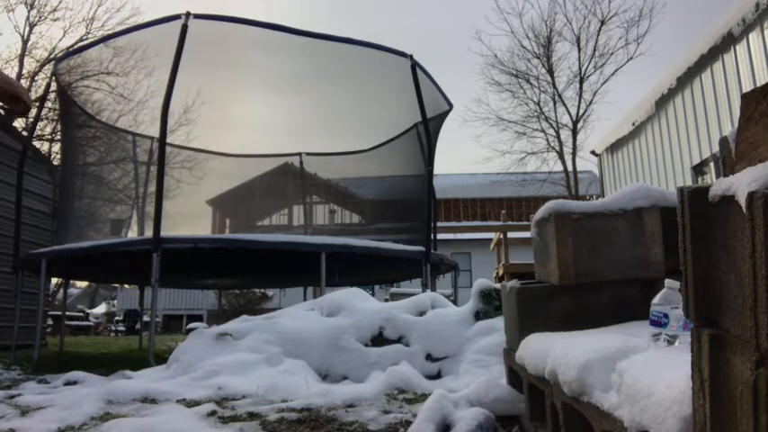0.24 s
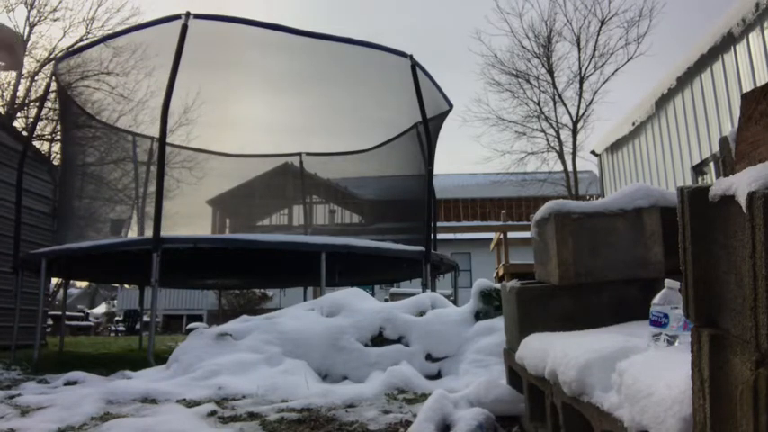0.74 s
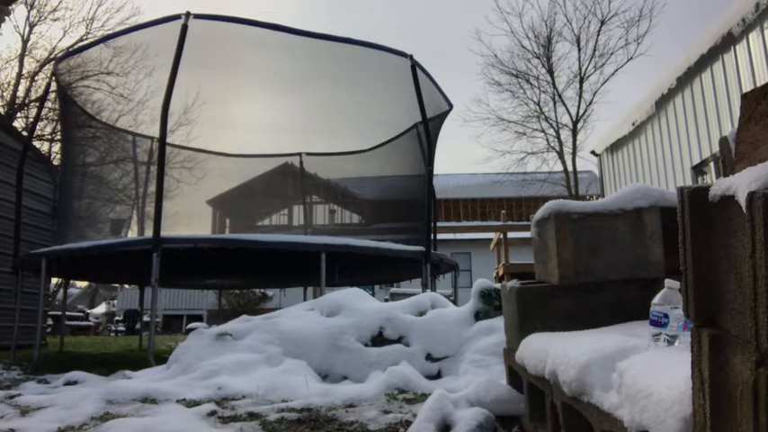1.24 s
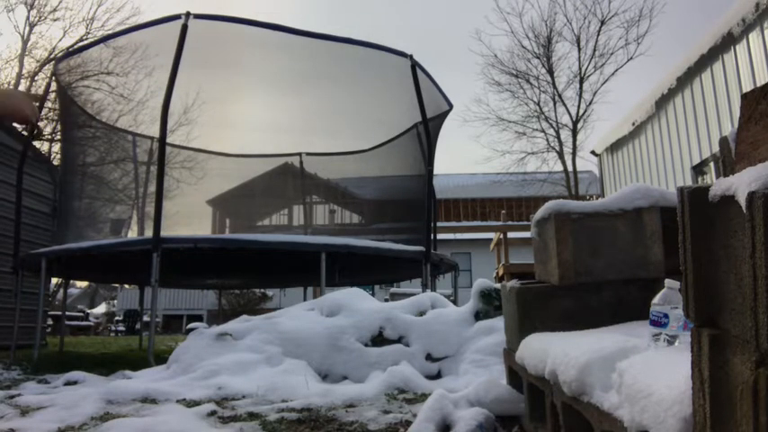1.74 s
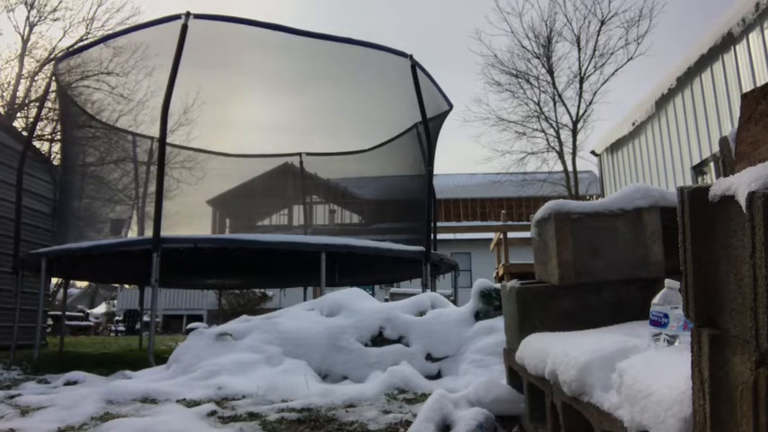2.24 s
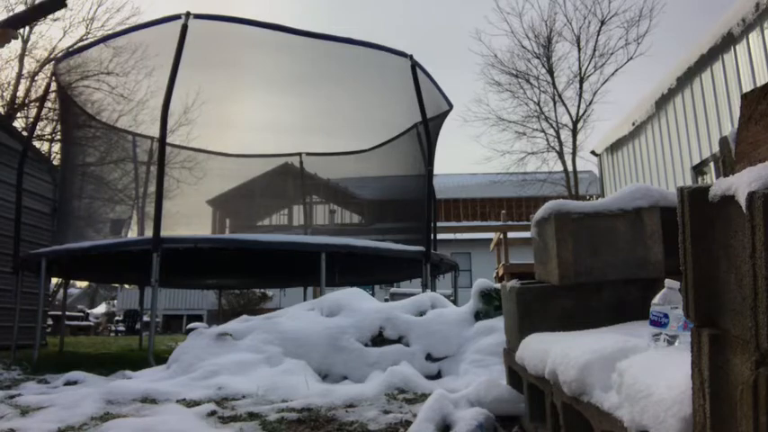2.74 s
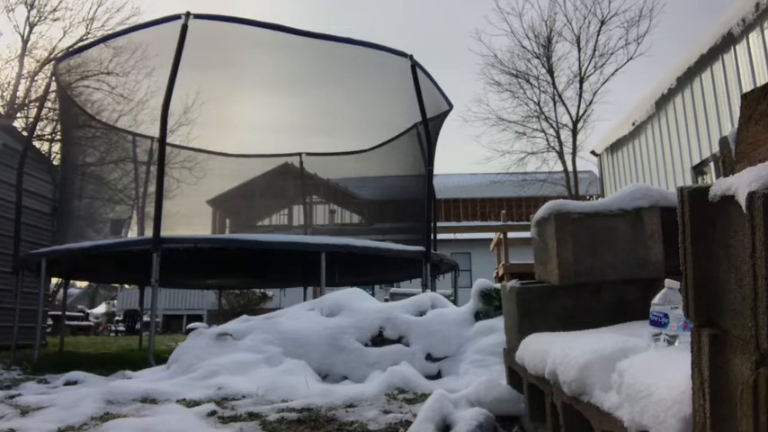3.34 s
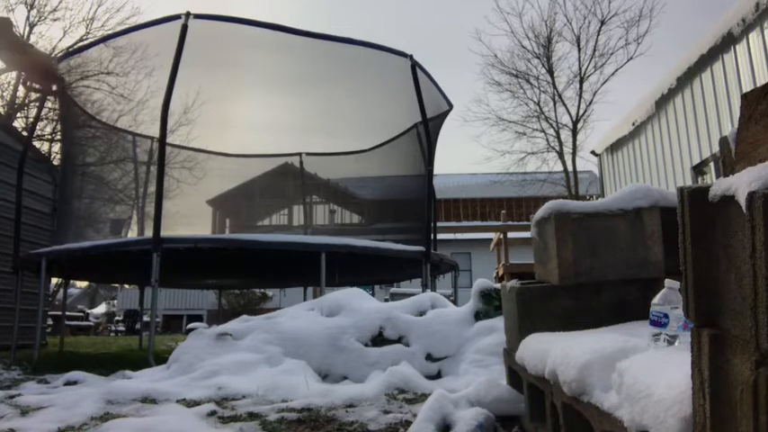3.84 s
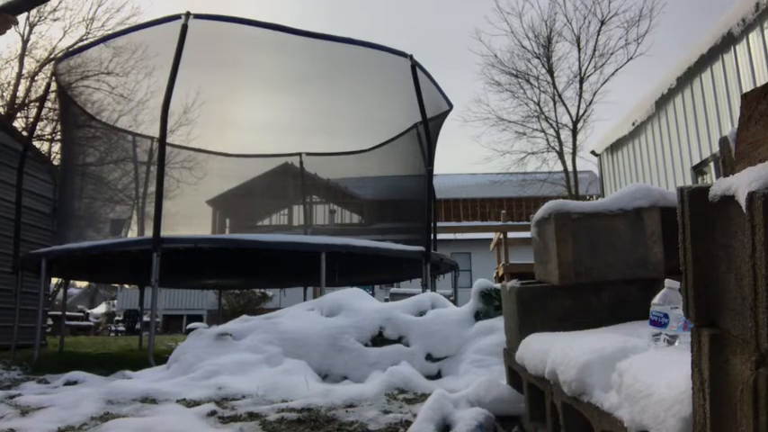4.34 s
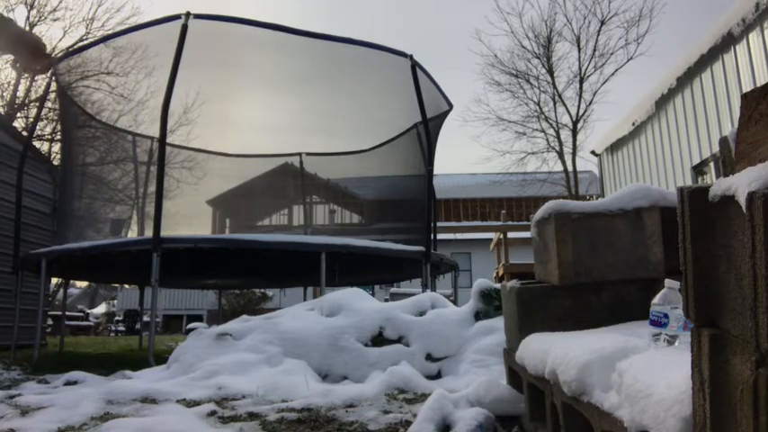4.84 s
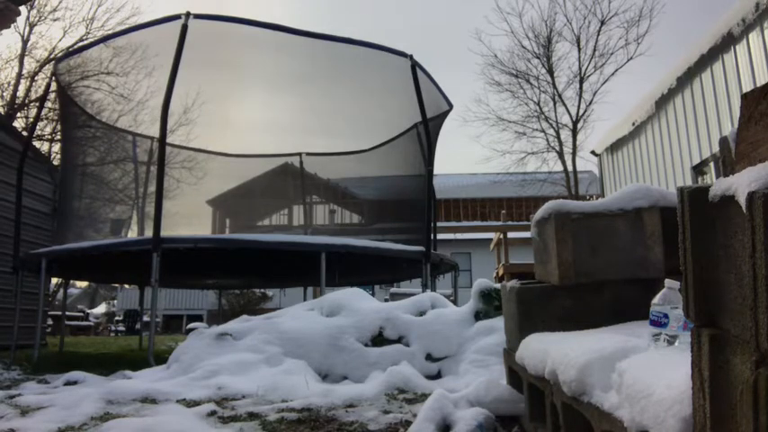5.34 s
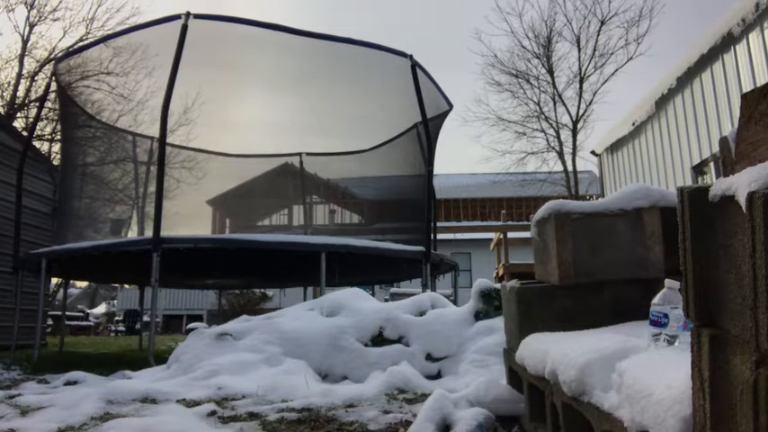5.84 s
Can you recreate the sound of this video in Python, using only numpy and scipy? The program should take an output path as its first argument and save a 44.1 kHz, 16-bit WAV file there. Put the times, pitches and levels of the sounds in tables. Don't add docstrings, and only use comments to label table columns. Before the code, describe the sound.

A six-second stretch of an air rifle being pumped by its lever in a snowy yard, very close to the microphone. At 0.2 s the opening lever touches its stop and rests with a mid-pitched click; at 0.54 s it slams shut, two or three contacts within milliseconds, bright steel over hollow plastic with a short low thump. A soft latch knock follows at 0.66 s. The cycle repeats with stop clicks near 0.95, 1.7, 2.5, 3.25, 4.05 and 5.05 s, and slams near 1.28, 2.09, 2.87, 3.63, 4.63 and 5.69 s, the last two strokes slower. Between them come tiny pin ticks, plastic creaks, grainy sliding, brief high squeaks and faint air hiss. Glove rubs and breathy valve whistles are barely audible. Sheds return short diffuse echoes; a low machine hum and yard air sit far beneath. Loose ticks close the stretch at 5.8-5.97 s.

```python
import sys
import numpy as np
from scipy import signal
from scipy.fft import rfft, irfft, next_fast_len
from scipy.io import wavfile
from scipy.ndimage import uniform_filter1d, map_coordinates

SR = 44100
rng = np.random.default_rng(int(sys.argv[2]) if len(sys.argv) > 2 else 0)


def makeup_ratio(level_db):
    decades = np.asarray(level_db, float) / 20
    return 10 ** decades


def unload_audio(sound):
    columns = np.transpose(np.atleast_2d(sound))
    steps = np.round(np.clip(columns, -1, 1) * 32767)
    wavfile.write(sys.argv[1], SR, steps.astype(np.int16))


N = 267667

# start_s [s], touch_db [dB], slip_db [dB], hardness_db [dB]
STOP_TOUCHES = [
    (0.1621, -41.5, -37.5, 0),
    (0.9382, -38.5, -39.5, 1),
    (1.66, -39, -36, 0.5),
    (2.4836, -38, -38, 1.5),
    (3.2489, -39, -37, -0.5),
    (4.034, -41, -36, 0),
    (5.0351, -39, -44, 0),
]
# start_s [s], peak_db [dB], grip_hz [Hz], extra_stock_db [dB]
REST_BLOWS = [
    (.1820, -18.5, 1840, -4),
    (.9574, -19.5, 1830, -6),
    (1.6792, -19, 1750, -1),
    (2.5026, -19.5, 1927, 0),
    (3.2680, -20.5, 1950, -1),
    (4.0533, -20, 2040, -1),
    (5.0552, -18.5, 1850, -6),
]
# start_s [s], level_db [dB], hardness_db [dB], extra_stock_db [dB], extra_grip_db [dB]
LATCH_KNOCKS = [
    (0.6585, -34, -1.5, -1.5, -6),
    (1.3883, -35.5, 2, -0.5, -0.5),
    (2.2194, -37, -0.5, -0.5, -1),
    (2.981, -35, -0.5, 1, 0),
    (3.761, -34, -1.5, 0, 1.5),
    (4.7636, -34, -1, 0, 0),
    (5.839, -37.5, -3, 0.5, -2.5),
]
# start_s [s], level_db [dB], hardness_db [dB], extra_stock_db [dB], extra_grip_db [dB]
SEATINGS = [
    (0.5399, -11, 1, 3, 4.8),
    (1.2842, -8.5, 0.65, 4.3, 1),
    (2.0859, -11.5, -1.9, 1.8, 1.7),
    (2.869, -12.5, -0.78, 2, 1.1),
    (3.631, -9, -1, 2.5, 0.89),
    (4.632, -10.5, 0.67, 2.2, 2.4),
    (5.689, -10, 0.94, 3, 3.5),
]
# stock_db [dB], grip_db [dB], tube_db [dB], link_db [dB], rattle_t60_ms [ms]
BY_SEAT = (-8, -1, 2.5, 2, 54)
LATCH_REACH = (1, 2, -3.5, -7.5, 29)


def unit(x):
    return x / np.sqrt(np.mean(x ** 2) + 1e-20)


def along(points, hz):
    f, v = np.transpose(points)
    return np.interp(np.log(hz + 1), np.log(f + 1), v)


def wobble(rate):
    knots = rng.standard_normal(int(N * rate / SR) + 4)
    return map_coordinates(knots, [np.arange(N) * rate / SR])


def rush(spectrum):
    m = next_fast_len(N + 8192)
    colour = makeup_ratio(along(spectrum, np.fft.rfftfreq(m, 1 / SR)))
    return unit(irfft(rfft(rng.standard_normal(m)) * colour, m)[:N])


def lay(sounds, start_s):
    length = sounds.shape[1]
    where = np.round(start_s * SR).astype(int) + np.arange(length)
    return np.bincount(where.ravel(), sounds.ravel(), N + length)[:N]


def ring(force, modes, scatter_db, head):
    f = np.fft.rfftfreq(force.shape[1], 1 / SR)
    gains = makeup_ratio(scatter_db * rng.standard_normal((len(force), len(modes))))
    shapes = np.array([(-1) ** k * makeup_ratio(db) * 1j * f * w / (c * c - f * f + 1j * f * w)
                       for k, (c, w, db) in enumerate(modes)])
    soft = 1 / (1 + 1j * f / (1.2 * modes[-1][0]))
    soft = soft * (1j * f / (1j * f + 430)) ** 2
    out = irfft(rfft(force) * (gains @ shapes) * soft, force.shape[1])
    return out / np.sqrt(np.mean(out[:, :head] ** 2, axis=1, keepdims=True))


def contacts(rows, parts, rise_s, spiky_db, blow, scatter_db):
    # pitch_hz [Hz], width_hz [Hz], level_db [dB]
    link_modes = [(6000, 410, -7), (6940, 510, -1), (9080, 1000, -4), (9830, 690, -3.5), (10970, 720, -7.5),
                  (12350, 920, -6.5), (12820, 480, -9.5), (14900, 980, -6.5), (15100, 920, -7)]
    s, *levels, t60_ms = np.transpose(rows)[:, :, None]
    t = np.arange(2048) / SR
    spikes = makeup_ratio(spiky_db * rng.standard_normal((len(s), len(t))))
    chatter = rng.standard_normal((4, len(s), len(t))) * spikes
    lives = (0.71, 0.85, 0.65, 0.53)
    weights = (1.8, 0.85, 0.46, 0.58)
    heads = (121, 102, 79, 67)
    sound = 0
    for db, grit, modes, share, weight, head in zip(levels, chatter, [*parts, link_modes], lives, weights, heads):
        decay = makeup_ratio(-60 * t / (share * np.maximum(t60_ms, 3) / 1000))
        force = grit * (1 - np.exp(-t / rise_s)) * decay
        force[:, 8] += blow * weight
        sound = sound + makeup_ratio(db) * ring(force, modes, scatter_db, head)
    return lay(sound, s)


def struck(rows, kind):
    # stock [dB/dB], grip [dB/dB], tube [dB/dB], link [dB/dB]
    hardness_tilt = (-0.014, -0.52, 0.25, 0.88)
    out = []
    for s, db, hard_db, *extra in rows:
        held = np.pad(extra, (0, 4 - len(extra)))
        levels = db + np.array(kind[:4]) + hard_db * np.array(hardness_tilt) + held
        out.append((s, *levels, kind[4]))
    return out


def swells(rows, modes, lumpy_db):
    s, length, db = np.transpose(rows)[:, :, None]
    t = np.arange(8192) / SR
    lumps = makeup_ratio(lumpy_db * wobble(45)[:len(s) * len(t)].reshape(len(s), -1))
    force = rng.standard_normal(lumps.shape) * lumps * np.sin(np.pi * np.minimum(t / length, 1)) ** 2
    return lay(makeup_ratio(db) * ring(force, modes, scatter_db=5, head=4096), s)


def background():
    # pitch_hz [Hz], density_db [dB per Hz]
    air_curve = [(20, -21.5), (55, -0.5), (110, -7), (200, -13.5), (330, -20), (750, -26), (2000, -34),
                 (5000, -44.5), (14000, -56), (16500, -55)]
    # pitch_hz [Hz], level_db [dB rms], start_phase [radians]
    hum_lines = [(35.01, -71, -1.53), (55.44, -44.5, 1.42), (124.39, -73, -.04)]
    t = np.arange(N) / SR
    hum = sum(np.sqrt(2) * makeup_ratio(db) * np.sin(2 * np.pi * hz * t + start) for hz, db, start in hum_lines)
    return makeup_ratio(0.6 + 0.4 * wobble(3)) * hum + makeup_ratio(-57 + 1.1 * wobble(5)) * rush(air_curve)


def slide():
    # pitch_hz [Hz], density_db [dB per Hz]
    rub_curve = [(240, -27), (400, -10), (513, -1.5), (971, -1), (1350, -6), (3070, -6.5), (14100, -16),
                 (15700, -15.5), (16500, -53)]
    latch_db, stop_db, eased_db, shut_db, ease_s = -57.5, -59.5, -68.5, -70, 0.08
    stations = [(0.023, latch_db)]
    stations += [(s, latch_db) for s, *_ in LATCH_KNOCKS]
    stations += [(s, shut_db) for s, *_ in SEATINGS]
    for s, *_ in STOP_TOUCHES:
        stations += [(s, stop_db), (s + ease_s, eased_db)]
    s, db = np.transpose(sorted(stations))
    grain = makeup_ratio(wobble(89) + 0.76 * wobble(8.7))
    return makeup_ratio(np.interp(np.arange(N) / SR, s, db) - 1.5) * unit(grain * rush(rub_curve))


def leak():
    # pitch_hz [Hz], density_db [dB per Hz]
    hiss_curve = [(2500, -29), (5000, -6.5), (9000, -1), (10500, -6.5), (12200, 1), (15500, -2.5),
                  (16500, -40)]
    spurt_db, spurt_s, still_db, drawn_db, stops_in_s = -55.5, 0.16, -81, -68.5, 0.03
    stations = []
    for s, *_ in SEATINGS:
        stations += [(s - 0.001, still_db), (s, spurt_db), (s + spurt_s, still_db)]
    for s, *_ in STOP_TOUCHES:
        stations += [(s, drawn_db), (s + stops_in_s, still_db)]
    s, db = np.transpose(sorted(stations))
    return makeup_ratio(np.interp(np.arange(N) / SR, s, db) + 1.5 * wobble(40)) * rush(hiss_curve)


def seal():
    squeaks = [
        (0.1514, -45),
        (0.9359, -43.5),
        (1.653, -38),
        (2.472, -44),
        (3.2491, -49.5),
        (4.0213, -50),
        (5.0255, -48),
    ]
    out, t = np.zeros(N + SR), np.arange(SR // 80) / SR
    for s, db in squeaks:
        hz = 12400 * (1 + 0.02 * rng.standard_normal())
        drift = np.cumsum(0.12 * rng.standard_normal(len(t)))
        squeak = np.hanning(len(t)) * np.sin(2 * np.pi * hz * t + drift)
        out[round(s * SR):][:len(t)] += makeup_ratio(db - 10) * squeak
    return out[:N]


def stop_contacts():
    # pitch_hz [Hz], width_hz [Hz], level_db [dB]
    stop_modes = [
        [(630, 120, -4), (820, 220, -3), (1150, 260, -5)],
        [(1800, 350, -3), (2450, 600, -6)],
        [(3100, 300, 0), (4330, 500, -5), (5150, 450, -2)],
    ]
    # stock dB, grip dB, tube dB, link dB, rattle t60 ms
    by_touch, by_slip, by_rest = (-8, -4, 0, -6, 48), (-5, -1, -10, -13.5, 39.5), (-21, -21, -26, -30, 75)
    held_stock_db = [1, -2.5, 0, -2.5, 0.5, 2.5, -4.5]
    held_grip_db = [-2.3, 0.92, 0.4, -1.1, -1, 1, 0.5]
    rows = []
    for touch, rest, *held in zip(STOP_TOUCHES, REST_BLOWS, held_stock_db, held_grip_db):
        s, touch_db, slip_db, hard_db = touch
        rows += struck([(s, touch_db, hard_db, *held)], by_touch)
        rows += struck([(s + 0.0087, slip_db, hard_db, *held)], by_slip)
        rows += struck([(rest[0], rest[1], hard_db, *held)], by_rest)
    rise_s = np.tile([0.001, 0.0006, 0.0005], len(STOP_TOUCHES))[:, None]
    blow = np.tile([1.5, 5, 1], len(STOP_TOUCHES))
    return contacts(rows, stop_modes, rise_s=rise_s, spiky_db=5, blow=blow, scatter_db=2.5)


def thump():
    # start_s [s], level_db [dB]
    jolts = [
        (0.536, -15),
        (1.285, -14.5),
        (2.085, -17),
        (2.867, -17.5),
        (3.629, -17.5),
        (4.629, -21),
        (5.687, -17.5),
    ]
    pushes = [(s, db, 210) for s, db, *_ in jolts + struck(LATCH_KNOCKS, LATCH_REACH)]
    pushes += [(s, -36, 135) for s, *_ in STOP_TOUCHES + REST_BLOWS]
    out, t = np.zeros(N + SR), np.arange(SR // 10) / SR
    for s, db, hz in pushes:
        low = makeup_ratio(-11.5 - 60 * t / 0.035) * np.sin(2 * np.pi * hz * t)
        low += makeup_ratio(-22 - 60 * t / 0.03) * np.sin(2 * np.pi * 1.43 * hz * t)
        out[round(s * SR):][:len(t)] += makeup_ratio(db) * low * (1 - np.exp(-t / 0.0029))
    return out[:N]


def snaps():
    # start_s [s], peak_db [dB]
    catch_snaps = [(.5351, -8), (.5402, -4), (1.2808, -4), (1.2846, -7), (2.0815, -9), (2.0862, -6),
                   (2.8625, -2), (3.6274, -2), (4.6282, -2), (4.6334, -6), (5.6855, -2), (5.6906, -9),
                   (2.4925, -28), (2.4942, -28)]
    # pitch_hz [Hz], width_hz [Hz], level_db [dB]
    catch_modes = [(3950, 850, 2.5), (7000, 900, 2.5), (9500, 1300, -8), (15200, 2500, -9)]
    # start_s [s], peak_db [dB], pitch_hz [Hz], width_hz [Hz]
    bounces = [(.5408, -4.5, 1270, 450), (.5415, -0.5, 5000, 600), (.5424, -12, 3100, 600),
               (.5447, -11, 3290, 700), (1.2823, -9.5, 3000, 597), (1.2852, 2, 3140, 351),
               (1.2853, -13, 930, 400), (1.2864, -8, 4900, 500), (1.2886, -9, 3900, 704),
               (2.0872, -3, 2450, 900), (2.0886, -7, 5200, 497), (2.0895, -3, 3100, 593),
               (2.8696, -3, 3030, 451), (2.8698, -6.5, 1120, 380), (2.8722, -4, 2730, 502),
               (2.8745, -14, 846, 200), (3.6313, 3, 2740, 453), (3.6330, -3, 4760, 500),
               (3.6347, -10.5, 3206, 594), (4.6322, -1.5, 1358, 503), (4.6330, -0.5, 5250, 496),
               (4.6350, -2, 4600, 700), (4.6362, -14.5, 953, 300), (5.6864, -14.5, 790, 149.5),
               (5.6894, -5, 3300, 687), (5.6928, 3.5, 2970, 442), (.7464, -36, 1560, 130),
               (2.2965, -33, 1570, 200), (3.842, -36.5, 1500, 90), (5.9222, -26, 1554, 130.5),
               (1.4688, -40.5, 1600, 150), (5.899, -35.5, 763, 119.7), (3.8165, -37, 5370, 399),
               (2.274, -30.5, 5280, 400)]
    # start_s [s], peak_db [dB], pitch_hz [Hz], width_hz [Hz]
    booms = [(.5362, -16, 630, 68), (.5440, -18.5, 560, 200), (3.6385, -19.5, 720, 150),
             (5.6960, -16.5, 780, 94), (4.6325, -5.5, 7400, 550), (4.6345, -11, 3600, 700),
             (3.6322, -7, 3050, 390), (1.2862, -6.5, 3800, 370), (.4262, -35, 900, 200),
             (.4264, -33.5, 2700, 350), (0.82, -42, 770, 230), (.7188, -38, 4800, 450),
             (1.1905, -42, 1500, 250), (0.61, -32, 1600, 350), (2.0125, -49.5, 3100, 400),
             (1.8455, -49, 1570, 200), (0.72, -32.5, 3100, 360), (.6588, -35, 4100, 500),
             (2.531, -48, 3280, 250)]
    # start_s [s], peak_db [dB], pitch_hz [Hz], width_hz [Hz]
    hollows = [(.5400, -11, 1000, 260), (1.2845, -11, 890, 130), (2.0865, -14.5, 880, 90),
               (2.8625, -15, 790, 120), (2.8748, -15.5, 800, 140), (3.6270, -12.5, 940, 160),
               (3.6322, -12, 840, 230), (4.6355, -7.5, 930, 180), (4.6325, -14.5, 860, 250),
               (4.6285, -9.5, 3800, 560), (3.6326, -8.5, 3000, 450), (2.8698, -10, 4200, 530),
               (4.4118, -45.5, 1700, 350), (4.414, -52, 910, 130), (4.3222, -52.5, 1320, 360),
               (.5370, -15, 800, 170), (1.2812, -12.5, 800, 180), (2.0835, -14, 910, 170),
               (2.8655, -20, 1100, 230), (4.629, -15.5, 780, 200), (5.6900, -11.5, 796, 130),
               (5.690, -14.5, 1800, 230), (1.2860, -12.5, 1500, 400), (2.0885, -14.5, 1600, 320),
               (3.6345, -10, 4200, 500), (2.8705, -13, 5300, 580), (2.873, -14.5, 4900, 700),
               (4.643, -21.5, 900, 150), (3.645, -23.5, 900, 150), (5.6880, -13, 1035, 200),
               (5.6915, -10, 2420, 350), (1.2870, -14, 1010, 200), (.7190, -38, 1500, 300),
               (1.4466, -36, 5300, 500), (3.0355, -34, 5300, 450), (2.2745, -40, 1450, 300),
               (.5425, -15, 1000, 200)]
    # pitch_hz [Hz], width_hz [Hz], over_contact_db [dB]
    latch_rings = [(660, 130, -4), (920, 140, 1), (2280, 220, 4), (3100, 300, 2), (4100, 600, 2),
                   (6800, 1200, -5)]
    # pitch_hz [Hz], width_hz [Hz], over_contact_db [dB]
    rest_rings = [(1170, 300, -8), (2550, 450, 0), (3030, 400, -8), (4250, 800, -5), (6800, 1300, -4),
                  (11500, 3000, -9)]
    clean_db = 2.5
    rows = [(s, db + clean_db, hz, width) for s, db, hz, width in bounces] + booms + hollows
    rows += [(s, db + level, hz, width) for s, db in catch_snaps for hz, width, level in catch_modes]
    rows += [(s + 0.0004, db + level, hz, width) for s, db, *_ in LATCH_KNOCKS for hz, width, level in latch_rings]
    for s, db, grip_hz, extra_db in REST_BLOWS:
        rows += [(s, db + level, hz, width) for hz, width, level in rest_rings]
        rows += [(s, db, grip_hz, 210)]
        rows += [(s + 0.0008, db + extra_db - 5, 765, 120)]
    rows += [(s + 0.003, db + 7, 640, 140) for s, db, *_ in STOP_TOUCHES]
    s, db, hz, width = np.transpose(rows)[:, :, None]
    t = np.arange(SR // 30) / SR
    sound = makeup_ratio(db) * np.sin(2 * np.pi * hz * t) * np.exp(-np.pi * width * t) * (1 - np.exp(-t / 0.00016))
    return signal.sosfilt(signal.butter(3, 480, "hp", fs=SR, output="sos"), lay(sound, s))


def stock_linger():
    # pitch_hz [Hz], over_stock_db [dB], t60_s [s]
    slow_modes = [(872, -7.5, .1), (1760, -15.5, 0.12)]
    blows = struck(SEATINGS, BY_SEAT) + [(s, db - 12) for s, db, *_ in REST_BLOWS]
    out, t = np.zeros(N + SR), np.arange(SR // 5) / SR
    for s, stock_db, *_ in blows:
        for hz, db, t60 in slow_modes:
            drift = np.cumsum(0.046 * rng.standard_normal(len(t)))
            envelope = makeup_ratio(stock_db + db - 60 * t / t60) * (1 - np.exp(-t / 0.0016))
            out[round(s * SR):][:len(t)] += envelope * np.sin(2 * np.pi * hz * t + drift)
    return out[:N]


def air_and_glove():
    # pitch_hz [Hz], width_hz [Hz], level_db [dB]
    gulp_modes = [(1200, 200, -3), (1500, 300, -0.5), (1830, 250, -4.5)]
    # pitch_hz [Hz], width_hz [Hz], level_db [dB]
    palm_modes = [(614, 120, -2), (880, 94, -6), (1460, 470, -12)]
    # start_s [s], length_s [s], level_db [dB]
    squeezes = [
        (.43, 0.046, -64.5),
        (1.13, 0.13, -66),
        (1.87, 0.11, -60),
        (2.69, 0.11, -58.5),
        (3.47, 0.109, -62.5),
        (4.29, 0.12, -69.5),
        (5.25, 0.081, -62.5),
    ]
    # start_s [s], length_s [s], pitch_hz [Hz], width_hz [Hz], level_db [dB]
    whistles = [
        (.965, 0.1, 1800, 60, -70.5),
        (4.113, 0.17, 1875, 45, -76),
        (4.52, .12, 2363, 14, -77.5),
    ]
    # start s, length s, dB
    gulps = [(s + 0.0193 + 0.0046, 0.13, -66) for s, *_ in STOP_TOUCHES]
    valve = sum(swells([(s, length, db)], [(hz, width, 0)], lumpy_db=3.5)
                for s, length, hz, width, db in whistles)
    return swells(gulps, gulp_modes, lumpy_db=4.5) + swells(squeezes, palm_modes, lumpy_db=5) + valve


def ticks():
    # pitch_hz [Hz], width_hz [Hz], level_db [dB]
    pivot_modes = [
        [(790, 290, 7.5), (1060, 130, -10.5)],
        [(1390, 160, 1.5), (2550, 450, -3.5)],
        [(3020, 300, -1), (4040, 560, -2), (5250, 650, 0)],
    ]
    # start_s [s], level_db [dB], hardness_db [dB]
    pins = [(.7036, -43.5, 1.5), (.7182, -40, -1.5), (.9312, -59, 1), (1.2256, -43.5, 1.5),
            (1.4259, -46.5, 0), (1.4462, -39, -3), (1.608, -59.5, -1), (1.877, -56, 3.5),
            (2.2739, -40.5, -6), (2.7313, -46, 3), (2.7804, -45, -1.5), (2.8555, -48, -1.5),
            (3.0351, -38, -5), (3.4666, -56.5, -2.5), (3.5051, -50, 1.5), (3.575, -47.5, -1),
            (3.6905, -46, 1.5), (3.8083, -43.5, -1), (4.3027, -48, 1), (4.3217, -47.5, 1),
            (4.4115, -45, -1), (4.8125, -35.5, 0), (4.8466, -44, 0.5), (5.2851, -50, 4), (5.3049, -46, 0.5),
            (5.4015, -56, 4), (5.4146, -50, 5.5), (5.8873, -41, -0.5), (5.9112, -38, -3),
            (5.965, -40.5, 2.5)]
    # start_s [s], level_db [dB], hardness_db [dB]
    creaks = [(.426, -37, 3), (.5606, -44, 2.5), (.7462, -41, -3.5), (1.1901, -42.5, 2), (1.4686, -47, -6),
              (1.4863, -42.5, 4), (1.7039, -64, -12), (1.8928, -60, 14), (1.9225, -55.5, 10),
              (2.03, -51.5, 11.5), (2.013, -63, 7.5), (2.2962, -45, -1), (2.3204, -42.5, -2),
              (2.728, -75, -5.5), (2.898, -42.5, 11), (3.0539, -48, 14), (3.0595, -42.5, -2.5),
              (3.0912, -49.5, -3), (3.3365, -66, -5.5), (3.3426, -58.5, 5), (3.5012, -60, -6.5),
              (3.8163, -38, 9), (3.842, -45.5, -7), (3.8796, -48.5, 8), (4.8347, -37.5, 3),
              (4.8766, -49, -3), (5.7093, -39.5, -6), (5.8738, -46, -4), (5.8956, -33.5, 11),
              (5.9217, -35, 8)]
    # start_s [s], level_db [dB], hardness_db [dB]
    shifts = [(.2159, -79, -12), (.339, -58, -7), (.4101, -59.5, 7), (.4541, -66, -6), (.5169, -57, -1),
              (.5292, -75, 7), (.6963, -68, -2), (1.1173, -58.5, -5), (1.1755, -59, 3), (1.257, -64, 3),
              (1.2627, -59, -1), (1.6525, -60, 3), (5.664, -57, -1), (1.845, -60.5, -6.5),
              (2.0637, -59, -1), (2.0747, -60, -7), (2.3118, -60, -11), (2.3422, -61, 11),
              (2.3693, -69, 14), (2.695, -58, 4), (3.026, -58, 4), (3.129, -78, 7), (3.6085, -58, -1),
              (3.7956, -59, 3), (4.2589, -63, 3.5), (4.6095, -59.5, 2), (4.6173, -55, 0.5),
              (5.242, -62, 5.5), (5.2514, -57.5, -2), (5.814, -63, 8)]
    rows = struck(pins, (-7.5, -5.5, 0, 2, 30))
    rows += struck(creaks, (-2.5, -1, -4, -14, 39))
    rows += struck(shifts, (-1.5, -0.7, 0, -1, 28.5))
    return contacts(rows, pivot_modes, rise_s=0.00085, spiky_db=1.5, blow=5, scatter_db=3.5)


def slams():
    # pitch_hz [Hz], width_hz [Hz], level_db [dB]
    stock_modes = [(622, 160, -4.5), (794, 90, 4.5), (867, 110, -0.5), (950, 120, -0.5)]
    # pitch_hz [Hz], width_hz [Hz], level_db [dB]
    grip_modes = [(1296, 370, -5.5), (1677, 220, -3.5), (2430, 400, -5)]
    # pitch_hz [Hz], width_hz [Hz], level_db [dB]
    tube_modes = [(2930, 190, -2.5), (3900, 450, -5.5), (4580, 530, -2), (5220, 1100, -8)]
    grazes = [
        (0.5348, -21, 5, -1, -1),
        (1.2785, -20, 0.5, 3, -1.5),
        (2.0813, -20.5, -1, 2, 1.5),
        (2.8596, -24, -5, -0.5, 0.5),
        (3.6253, -23.5, 4, -0.5, -1.5),
        (4.6265, -21.5, 0, -2, -1),
        (5.6845, -27, 12, -1, -2),
    ]
    catches = [
        (0.5372, -21.5, -2.1, 6.6, 3),
        (1.2806, -11.5, 0.072, 2.9, 3),
        (2.0835, -22.5, 0.29, 4.1, 3),
        (2.8624, -22.5, 0, 3.6, 3),
        (3.6272, -14.5, -1.3, 5, 3),
        (4.628, -18.5, 0.089, 3.1, 3),
        (5.6855, -17.5, 0.26, 7.6, 3),
    ]
    rows = struck(grazes, (-1, -2, 1.5, 2, 38.5))
    rows += struck(catches, (-5.5, -10.5, 5, -4, 26.5))
    rows += struck(SEATINGS, BY_SEAT)
    parts = [stock_modes, grip_modes, tube_modes]
    return contacts(rows, parts, rise_s=0.0002, spiky_db=4, blow=10, scatter_db=1.6)


def latch():
    # pitch_hz [Hz], width_hz [Hz], level_db [dB]
    latch_modes = [
        [(640, 100, -7), (930, 140, -3.5)],
        [(1300, 240, -4), (2296, 340, 2)],
        [(3160, 560, 0), (3920, 400, 7), (5470, 1500, -7)],
    ]
    rows = struck(LATCH_KNOCKS, LATCH_REACH)
    return contacts(rows, latch_modes, rise_s=0.00039, spiky_db=4.5, blow=4, scatter_db=2.5)


def yard(x):
    # pitch_hz [Hz], t60_s [s], level_db [dB]
    scatter = [(300, 0.43, -9), (880, 0.17, 1), (1600, 0.54, 0), (2330, 0.17, 0), (3130, 0.53, 0),
               (6000, 0.45, -3), (10000, 0.15, 4), (16000, 0.3, -3.5)]
    # delay_s [s], level_db [dB]
    walls = [
        (0.024, -5),
        (.036, -11.5),
        (.066, 0.5),
        (.085, -5.5),
    ]
    hz, t, z = signal.stft(x, SR, nperseg=256)
    energy = uniform_filter1d(np.abs(z) ** 2, size=9, axis=0)
    lag = t[:240]
    f, t60, db = np.transpose(scatter)
    swell = 1 + sum(makeup_ratio(wall_db + 5) * np.exp(-((lag - d) / 0.0013) ** 2) for d, wall_db in walls)
    level_db = along(list(zip(f, db)), hz)[:, None]
    decay_s = along(list(zip(f, t60)), hz)[:, None]
    answer = swell * makeup_ratio(level_db - 60 * lag / decay_s)
    answer = answer * (lag > 0.006)
    back = signal.fftconvolve(energy, answer ** 2, axes=1)[:, :len(t)]
    fresh = signal.stft(rng.standard_normal(N), SR, nperseg=256)[2]
    fresh = fresh / np.sqrt(np.mean(np.abs(fresh) ** 2))
    patches = uniform_filter1d(rng.standard_normal(z.shape), size=4, axis=0)
    patches = unit(uniform_filter1d(patches, size=2, axis=1))
    back = back * makeup_ratio(1.3 * patches) ** 2
    return signal.istft(fresh * np.sqrt(np.abs(back)), SR, nperseg=256)[1][:N]


def scene():
    rifle = makeup_ratio(-5.5) * slams() + latch() + stop_contacts() + ticks()
    rifle = rifle + snaps() + thump() + seal() + stock_linger()
    around = makeup_ratio(-32) * yard(rifle) + background()
    return (rifle + around + slide() + air_and_glove() + leak())[None]


def low_pass(x):
    return signal.sosfilt(signal.butter(12, 17130, fs=SR, output="sos"), x)


def record(dry):
    dry = signal.sosfilt(signal.butter(1, 22, "hp", fs=SR, output="sos"), dry)
    dry = dry - 0.45 * signal.lfilter(*signal.iirpeak(10500, 9, fs=SR), dry)
    fall = np.exp(-1 / (0.12 * SR))
    held = signal.lfilter([1 - fall], [1, -fall], dry ** 2)
    ducked = dry / (1 + held / makeup_ratio(-26) ** 2) ** 0.22
    rounded = ducked / (1 + np.abs(ducked / 0.9) ** 6) ** (1 / 6)
    heard = signal.sosfilt(signal.cheby2(8, 45, 17100, fs=SR, output="sos"), rounded)
    return low_pass(heard)


dry = scene()
out = record(dry)
unload_audio(out)
```